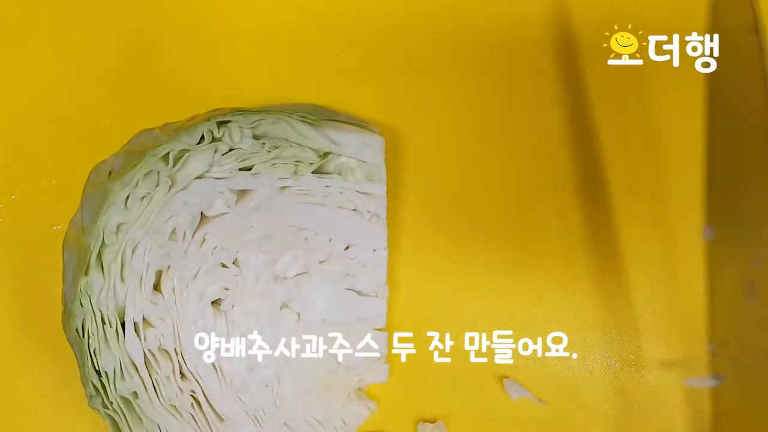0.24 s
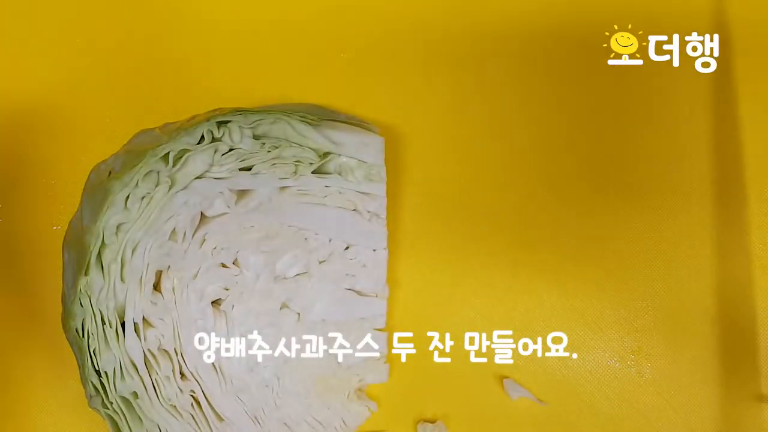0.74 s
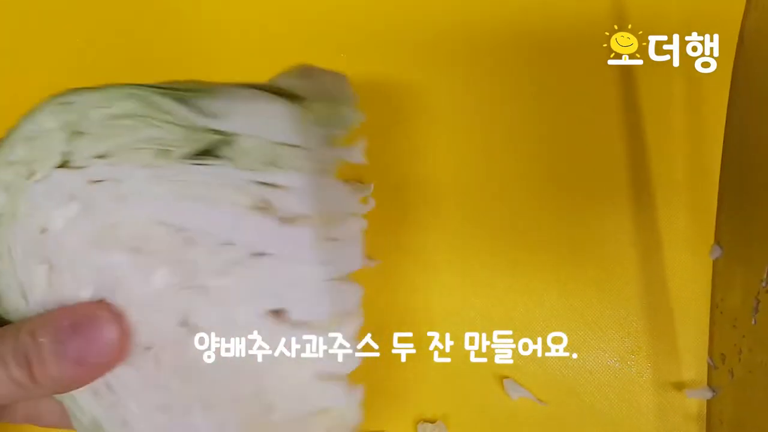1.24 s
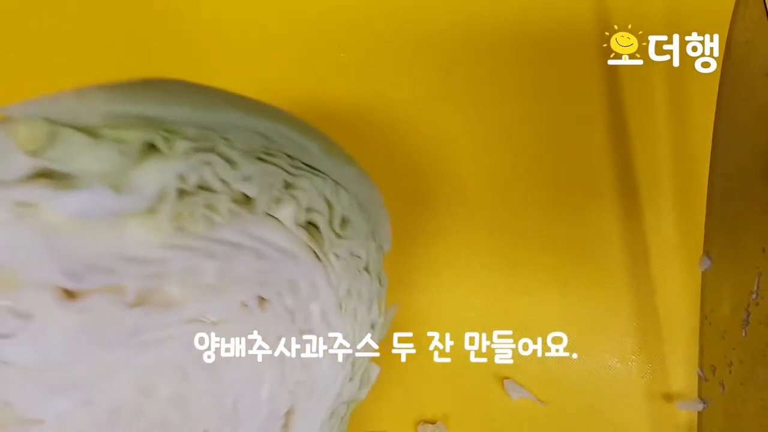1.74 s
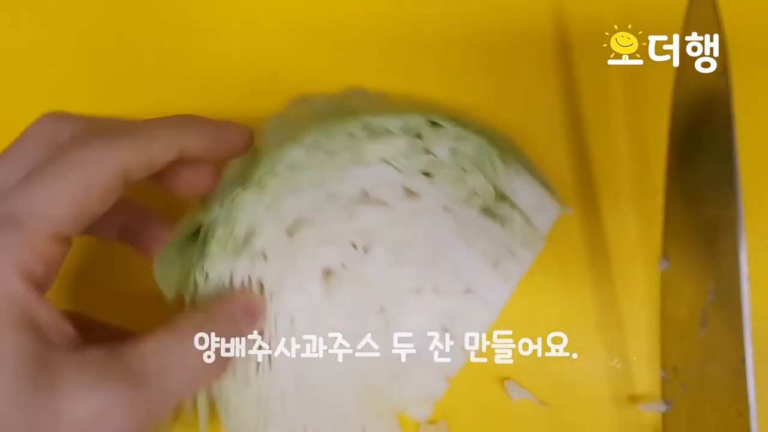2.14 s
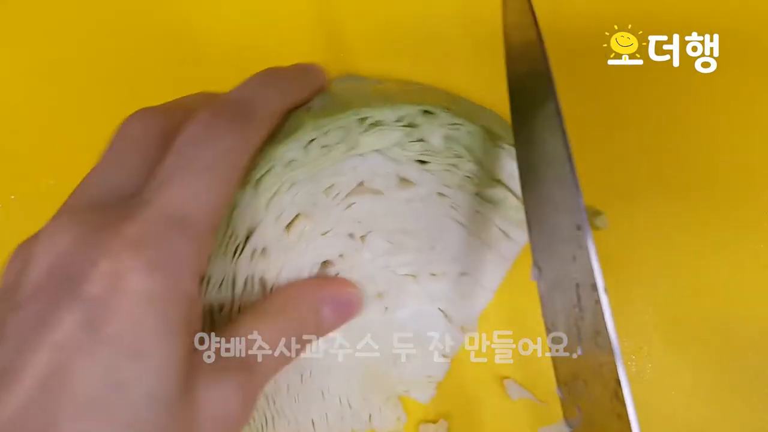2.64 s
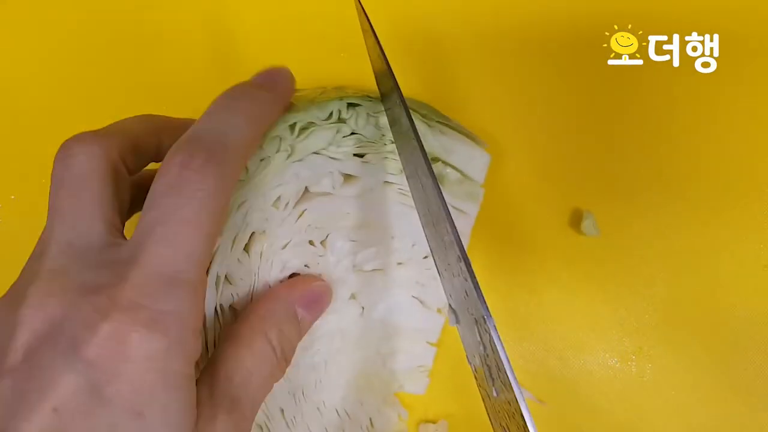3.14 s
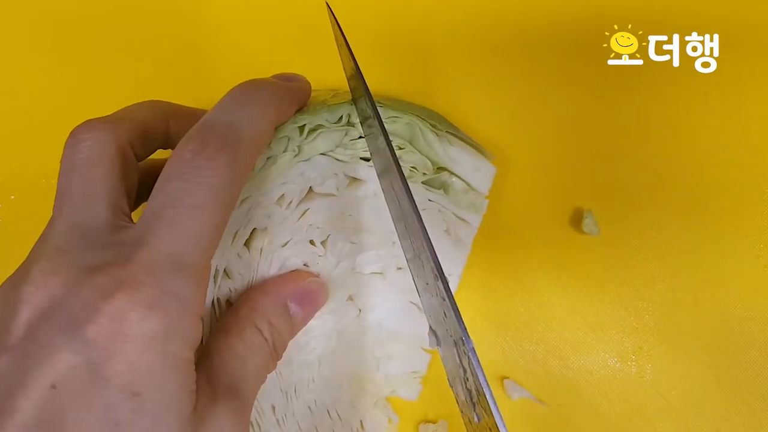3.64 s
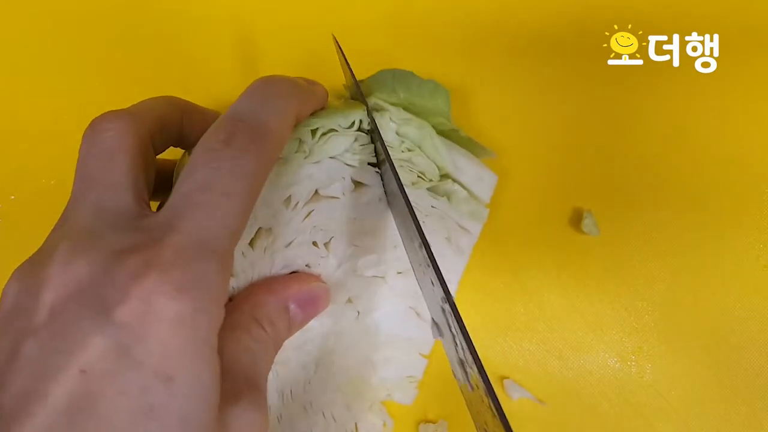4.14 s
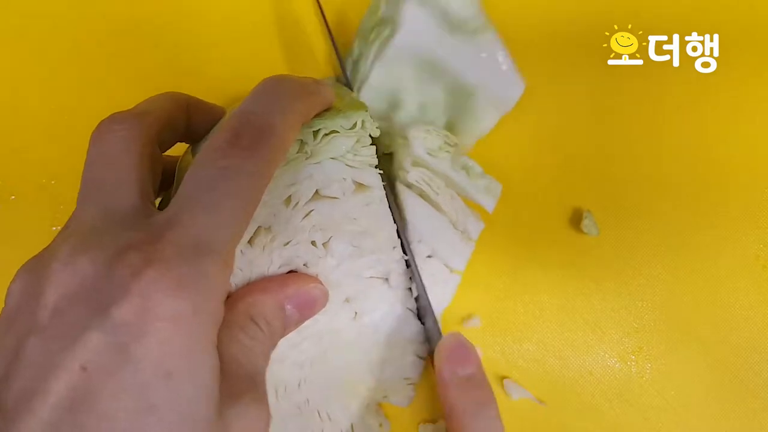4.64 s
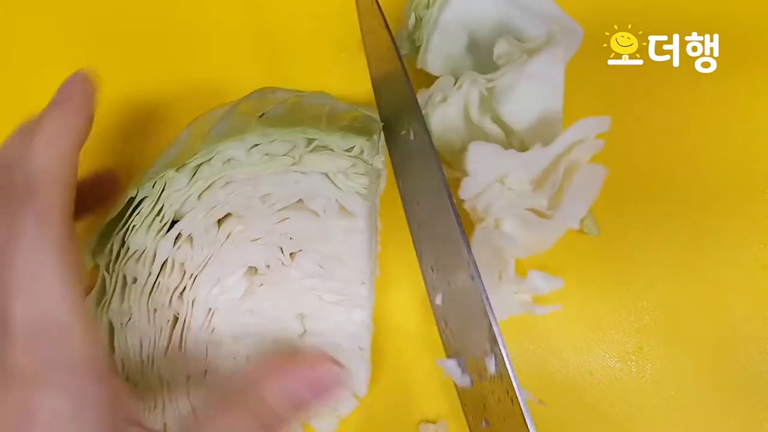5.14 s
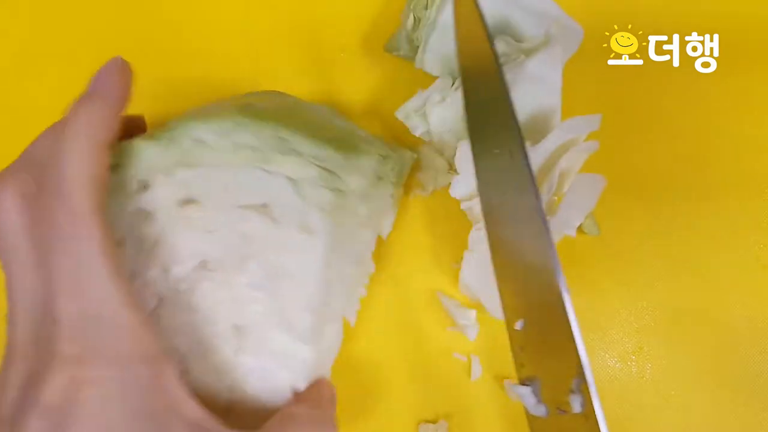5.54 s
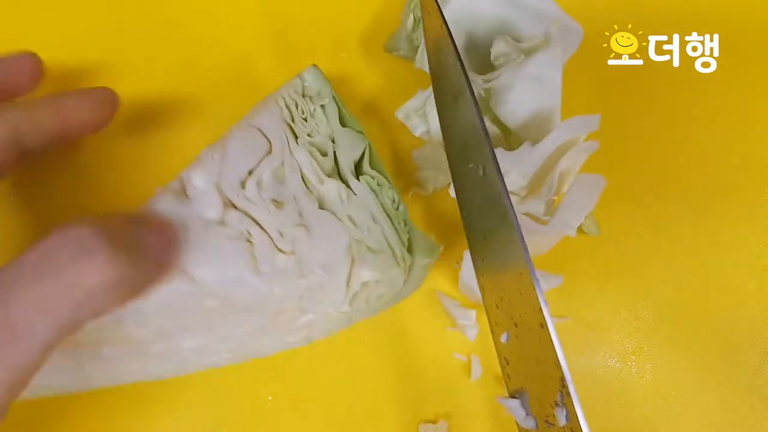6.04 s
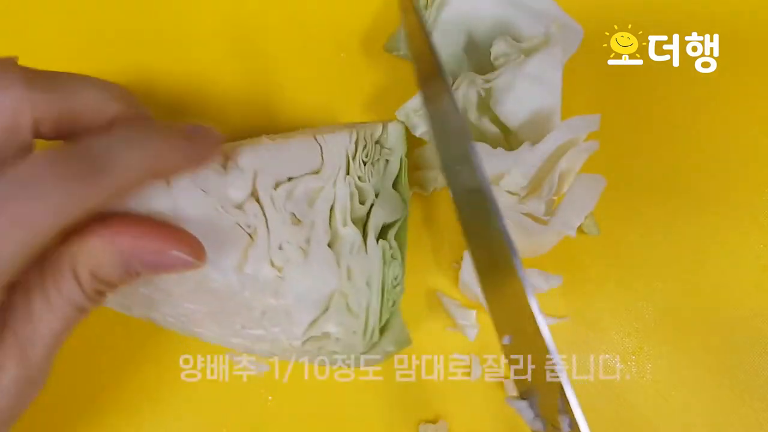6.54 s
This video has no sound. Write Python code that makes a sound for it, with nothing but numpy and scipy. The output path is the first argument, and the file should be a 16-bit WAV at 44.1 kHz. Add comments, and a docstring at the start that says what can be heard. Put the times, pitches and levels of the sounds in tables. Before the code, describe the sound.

Wooden board clatters and soft thuds, cabbage rustling as it is turned, then a knife crunches through it in two pushes, ending in a sharp knock.

```python
"""A knife crunches down through a wedge of raw cabbage in two pushes, after a hand has turned it on the board.
Leaf cells burst in dense random clicks shaped by band-passes; single ribs snap as short splinters of noise.
Blows and the push of the knife ring decaying modes of the board, the worktop and the blade.
Rubbed leaves rustle, loose ones tick, and a faint squeak swells at the very end.
A small hard kitchen answers with decaying noise, over filtered noise for a fridge hum and microphone hiss."""
import sys
import numpy as np
from scipy import signal
from scipy.fft import rfft, irfft
from scipy.io import wavfile
from scipy.ndimage import uniform_filter1d

SR = 44100
rng = np.random.default_rng(int(sys.argv[2]) if len(sys.argv) > 2 else 0)


def file_out(sig):
    """Save sig as 16-bit WAV at sys.argv[1]."""
    # one column per channel
    cols = np.atleast_2d(sig).T
    # limit, then scale
    lim = np.clip(cols, -1, 1)
    pcm = np.round(lim * 32767).astype(np.int16)
    wavfile.write(sys.argv[1], SR, pcm)


N = 299880  # length in samples


def undb(db):
    """Turn decibels into a plain gain."""
    return 10 ** (np.asarray(db) / 20)


def unit(x):
    """Scale a signal to an average (RMS) level of 1."""
    return x / np.sqrt(np.mean(x ** 2))


def sides(pan_db):
    """Gains of left and right; a positive pan_db makes the left louder by that much."""
    return undb(np.array([pan_db, -pan_db]) / 2)


def lowpass(x, edge_hz):
    """Dull a sound by weakening what lies above edge_hz."""
    return signal.lfilter(*signal.butter(2, edge_hz / SR * 2), x)


def colour(x, peaks):
    """Sum of band-passes, each with gain 1 at its centre before its own level is applied."""
    total = 0
    for hz, width_hz, db in peaks:
        total = total + undb(db) * signal.lfilter(*signal.iirpeak(hz, hz / width_hz, SR), x)
    return total


def ring(x, modes, free=0.76):
    """Each mode is a decaying rotation pushed by x; a hand or a weight on it (small free) shortens the ring."""
    total = 0
    for k, (hz, db, t60) in enumerate(modes):
        pole = np.exp(2j * np.pi * hz / SR - np.log(1000) / (free * t60 * SR))
        swing = signal.lfilter([pole.imag], [1, -2 * pole.real, abs(pole) ** 2], x)
        # neighbours swing in opposite sense, so little sounds below and above them
        total = total + (-1) ** k * undb(db) * swing
    return total


def walk(rate):
    """Random levels, a new one every 1 / rate s, smoothed twice into gentle wandering."""
    k = int(SR / rate)
    steps = np.repeat(rng.standard_normal(N // k + 1), k)
    return uniform_filter1d(uniform_filter1d(steps, k), k)[:N]


def bursts(per_s, spread_db):
    """Random clicks of either sign, a few much larger than the rest."""
    chance = rng.random((3, N))
    happens = chance[0] < per_s / SR
    size_db = spread_db * np.minimum(-np.log(1 - chance[2]), 4)
    return happens * np.sign(chance[1] - .5) * undb(size_db)


def follow(tables):
    """Columns of the curve tables, sample by sample, and a gate that is shut outside them."""
    t, rows = np.arange(N) / SR, np.vstack(tables)
    gate = sum((t >= table[0][0]) & (t < table[-1][0]) for table in tables)
    curves = [np.interp(t, rows[:, 0], column) for column in rows[:, 1:].T]
    return uniform_filter1d(np.minimum(gate, 1.), 201), curves


# Colour of the quiet kitchen. Each row: frequency in Hz, relative strength in dB per Hz.
STILL = [(25, -14), (50, -1), (90, -10), (122, 1), (150, -11), (340, -13), (550, -19), (1500, -22),
         (2500, -26), (5500, -34), (9000, -37), (13500, -33), (15800, -36)]
# How much left and right share. Each row: frequency in Hz, likeness from 0 to 1.
ALIKE = [(60, 0.66), (130, 0.67), (290, 0.5), (700, 0.53), (1400, 0.12)]
STILL_DB = -67  # level of what both sides share, before the balance of left and right


def still():
    """Steady air with the drone of a fridge and microphone hiss, most alike at both sides in the bass."""
    log_hz = np.log(np.maximum(np.fft.rfftfreq(N, 1 / SR), 1))
    still_hz, strength_db = np.array(STILL).T
    alike_hz, likeness = np.array(ALIKE).T
    gain = undb(np.interp(log_hz, np.log(still_hz), strength_db))
    alike = np.clip(np.interp(log_hz, np.log(alike_hz), likeness), 0, 1)
    mid, side = rfft(rng.standard_normal((2, N))) * gain * np.sqrt([1 + alike, 1 - alike])
    air = irfft(np.array([mid + side, mid - side]), N) / np.std(irfft(mid, N))
    return undb(STILL_DB) * air * sides(2.2)[:, None]


# Seconds in which the echoes sink by 60 dB: bass and treble from the walls, then nearby surfaces.
KITCHEN_T60_LOW, KITCHEN_T60_HIGH, NEAR_T60 = 0.36, .21, 0.06
NEAR_DB = 3.5  # starting strength of the near echoes against the far ones
KITCHEN_DB = -2.5  # echo strength against the direct sound


def kitchen(x):
    """Diffuse echoes, different at each side: quick ones from nearby surfaces, then walls, treble dying first."""
    t = np.arange(SR // 2) / SR
    noise = rng.standard_normal((2, len(t)))
    low = signal.lfilter(*signal.butter(1, 3000 / SR * 2), noise)
    tail = low * undb(-60 * t / KITCHEN_T60_LOW) + (noise - low) * undb(-60 * t / KITCHEN_T60_HIGH)
    tail += noise * undb(NEAR_DB - 60 * t / NEAR_T60)
    tail *= np.minimum(t / 0.0013, 1)  # echoes fade in over 1.3 ms
    tail = signal.lfilter(*signal.butter(2, 220 / SR * 2, "high"), tail)
    tail /= np.sqrt(np.sum(tail ** 2, axis=1, keepdims=True))
    return undb(KITCHEN_DB) * signal.fftconvolve(x, tail, axes=1)[:, :N]


# The level passes SQUEAK_DB at SQUEAK_FROM_S, climbing all the time.
SQUEAK_FROM_S, SQUEAK_HZ, SQUEAK_DB, SQUEAK_SWELL_DB_PER_S = 6.755, 940, -80, 398


def squeak():
    """Quick stick-slip: a slightly rough tone and its octave."""
    since = np.arange(N) / SR - SQUEAK_FROM_S
    rough_hz = SQUEAK_HZ * (1 + 0.0123 * walk(350))
    phase = 2 * np.pi * np.cumsum(rough_hz) / SR
    return undb(SQUEAK_DB + SQUEAK_SWELL_DB_PER_S * since) * (np.sin(phase) + .5 * np.sin(2 * phase))


# Seconds from which the ticks have full strength.
TICKS_PER_S, TICK_DB, FULL_TICKS_FROM_S = 14., -70, .9


def ticks():
    """Loose leaves settle with faint scattered ticks, each a few ms of splinters."""
    t = np.arange(1024) / SR
    strength = np.where(np.arange(N) / SR < FULL_TICKS_FROM_S, .4, 1)
    starts = np.abs(bursts(TICKS_PER_S, spread_db=3.0)) * strength
    shape = signal.fftconvolve(starts, np.exp(-t / 0.0048))[:N]
    noise = rng.standard_normal((2, N))
    splinters = unit(colour(noise, CELL)) + undb(-8.0) * unit(colour(noise, CELL_TOP))
    return undb(TICK_DB) * shape * splinters


# Leaves rubbed by hand, blade or board; each swells from and dies to 20 dB below its loudest.
# Each row: loudest moment in seconds, swell in seconds, dying in seconds, crackle level in dB,
# brightness in dB and fullness in dB, both against the crackle.
RUSTLES = [(0.973, 0.091, 0.36, -61.5, 4, 7.5), (1.048, 0.03, 0.061, -54, -15, -16),
           (1.168, 0.11, 0.0097, -83, -12, 31.5), (1.4, 0.016, 0.15, -55, -4, -27),
           (1.501, 0.014, 0.023, -61, -12, 4), (1.6, 0.099, 0.068, -73.5, -3, 1),
           (1.84, 0.05, 0.083, -72.5, 8, -11), (1.904, 0.0026, 0.087, -53, 3.5, -11),
           (2.07, 0.055, 0.021, -37.5, 6, -11), (2.103, 0.012, 0.047, -30.5, 4, 3),
           (2.337, 0.18, 0.025, -59.5, -5, -0.5), (2.501, 0.0058, 0.01, -64, -44, -18),
           (2.602, 0.028, 0.9, -68.5, -3, 0), (2.766, 0.79, 0.06, -67.5, 6, 9),
           (2.896, 0.096, 0.022, -70.5, 12, 11), (3.164, 0.11, 0.022, -68.5, -7, -12),
           (3.245, 0.0097, 0.041, -70, 13, -8), (3.358, 0.009, 0.03, -63, 5, 3.5),
           (3.68, 0.15, 0.033, -71.5, 6, 7.5), (5.046, 0.053, 0.051, -66, -2, -13),
           (5.201, 0.079, 0.37, -72.5, 4, 7), (5.352, 0.11, 0.066, -60, 5, 4),
           (5.41, 0.015, 0.11, -58, 1, -3), (5.59, 0.11, 0.31, -63, 4.5, 2.5),
           (5.741, 0.014, 0.0095, -48.5, 6, -20), (5.849, 0.023, 0.059, -54, 8, -1),
           (6.0, 0.041, 0.16, -80, 4, 10), (6.2, 0.11, 0.056, -72, 13, -9),
           (6.308, 0.055, 0.21, -75, 17, 0), (6.6, 0.071, 0.043, -82.5, 4, 21.5),
           (6.8, 0.11, .05, -67, 0, -5)]


def rustles():
    """Gains of body, top and low crackle: each rustle swells and dies evenly in dB, and their powers add."""
    t, power = np.arange(N) / SR, np.zeros((3, N))
    for s, swell, dying, db, bright_db, full_db in RUSTLES:
        peak_power = undb([db, db + bright_db, db + full_db]) ** 2
        fade = undb(-40 * np.maximum((s - t) / swell, (t - s) / dying))
        power += np.outer(peak_power, fade)
    return np.sqrt(power)


RUSTLE_LOAD_DB = -6  # how strongly the low part of the rubbing drives the hum


def worktop(rubbing):
    """The uneven push through the cabbage keeps worktop, board and blade humming; rubbing does so too."""
    gate, (_, _, load_db, _) = follow(CUTS)
    push = bursts(per_s=300., spread_db=3.0)
    hum = unit(ring(push, WORKTOP, 0.18))
    hum = hum + undb(-10.5) * unit(ring(push, BOARD, 0.16))
    hum = hum + undb(-17.5) * unit(ring(push, BLADE, 0.18))
    load = gate * undb(load_db) + undb(RUSTLE_LOAD_DB) * rubbing[2]
    return load * hum * sides(2.7)[:, None]


DETUNE = .018  # each blow lands elsewhere and shifts the modes by about this share


def detuned(modes):
    """The same modes, each shifted a little in pitch."""
    shifts = DETUNE * rng.standard_normal(len(modes))
    return [(hz * (1 + shift), db, t60) for (hz, db, t60), shift in zip(modes, shifts)]


# Notes at which worktop, board, blade and the cracking surface ring.
# Each row: frequency in Hz, relative level in dB, seconds to sink by 60 dB when fully free.
WORKTOP = [(46.5, -28, 0.524), (78.9, -1.5, 0.97), (103.2, 3.5, 0.62), (123.1, 8.5, 0.57),
           (169.5, -9, 0.85), (213.7, -3, 0.65)]
BOARD = [(287.3, -3.5, 0.31), (334, -2.5, 0.48), (364, -5.5, 0.28), (414, 0, 0.17), (470, -5.5, 0.096),
         (514, -1, 0.15), (560, -10, 0.12), (618, -4.5, 0.17), (685, -5.5, 0.23), (954, -9, 0.11),
         (1180, -8, 0.11), (1112, -5.5, 0.17)]
BLADE = [(735, -5, 0.06), (782, 0, 0.085), (845, -9, 0.05)]
CRACK = [(1070, -35, 0.011), (1450, 0, 0.031), (1750, 4, 0.028), (2040, 5.5, 0.027), (2370, 9, 0.012),
         (3040, 7, 0.0061), (4400, -5.5, 0.0014), (7100, -21, 0.0052), (11000, -44, 0.00085)]
# The contact itself, heard before the board rings.
# Each row: centre in Hz, width in Hz, level in dB against the ring of the board.
TOUCH = [(472, 940, -5)]
# Blows on the board; the rows from 5.18 s on are the blade rubbing and squeaking. # Each row: start in seconds,
# then the levels of board, worktop, blade and crack in dB, # freedom to ring from 0 to 1 (0.1 at least is
# used), contact in ms.
KNOCKS = [(0.484, -66, -42.5, -74, -71, 0.11, 1.7), (0.512, -26, -54, -62, -39, 0.24, 4.4),
          (0.518, -24, -50, -30, -36.5, 0.33, 4.8), (0.533, -33, -64, -47, -42, 0.41, 30),
          (0.562, -30.5, -61, -45, -63, 0.26, 6.2), (0.578, -29.5, -59, -51, -63, 0.22, 7.9),
          (0.594, -37.5, -54, -39, -48.5, 1, 5.7), (0.8042, -30.5, -37, -57, -67, 0.46, 6.7),
          (0.826, -32.5, -27.5, -65, -49, 0.02, 9.8), (0.8764, -38.5, -35.5, -33, -46, 0.42, 1.03),
          (1.133, -57.5, -56, -51, -54, 1, 7.5), (1.165, -48.5, -46.5, -51, -66, 0.43, 2.5),
          (1.319, -85, -56.5, -82, -75, 0.44, 8), (2.102, -26, -24.5, -34, -18, 0.22, 2.7),
          (2.1064, -33.5, -25, -38, -17.5, 0.54, 1.1), (2.126, -41, -23.5, -47, -55, 0.44, 1.9),
          (2.174, -66, -30, -67, -63, 0, 10), (2.256, -79, -49.5, -54, -63, 1, 0.66),
          (2.692, -58.5, -48, -70, -50, 0.2, 10.2), (4.4072, -19, -27.5, -51, -32, 0.1, 0.68),
          (4.424, -31, -41, -60, -54, 0.1, 1.72), (4.849, -37, -65, -56, -55, 0.05, 3.77),
          (5.047, -68, -56, -48, -75, 0.3, 1.3), (5.186, -60.5, -70, -60.5, -76, 0.7, 7),
          (5.221, -61, -74, -63, -76, 0.9, 12), (5.362, -61, -70, -54, -61, 0.4, 15),
          (5.385, -72, -71, -53, -65, 0.45, 19), (5.416, -66, -71, -65, -70, 0.5, 5.6),
          (5.543, -63, -54.5, -58, -70, 0.7, 7.5), (5.569, -55.5, -61, -55, -64, 0.94, 17),
          (5.619, -54, -72, -56, -57, 0.22, 2.5)]
STRIKE = .9  # first touch against the rattle after it
THUD_EDGE_HZ = 2250  # edge of the dulling for a contact of 1 ms
KNOCK_PAN_DB, KNOCK_LAG = 2.5, 6  # the board lies to the left: louder there, later at the right (samples)


def knocks():
    """A rattling contact drives board, worktop, blade and the hard crack of the surface, each at its own level."""
    out, t = np.zeros(N + SR // 3), np.arange(SR // 3) / SR
    for s, *dbs, free, contact_ms in KNOCKS:
        shape = t / (max(contact_ms, .2) / 1000)
        rattle = np.minimum(6 * shape, 1) * np.exp(-shape) * rng.standard_normal(len(t))
        rattle[0] += STRIKE * np.sqrt(np.sum(rattle ** 2))  # the first touch is one clean blow
        # longer contact, duller thud
        thud = lowpass(rattle, np.clip(THUD_EDGE_HZ / contact_ms ** 0.57, 500, 5000))
        free = np.clip(free, .1, 1.5)
        board, top, blade = [ring(thud, detuned(modes), free) for modes in (BOARD, WORKTOP, BLADE)]
        touch = colour(thud, TOUCH)
        board = board / np.abs(board).max() - touch * undb(TOUCH[0][2]) / np.abs(touch).max()
        # a soft blow, weak in crack against the board, also has a duller crack
        edge_hz = np.clip(5500 * undb(0.49 * (dbs[3] - dbs[0])), 1500, 18000)
        crack = lowpass(ring(rattle, CRACK, free), edge_hz)
        i = int(s * SR)
        for gain, part in zip(undb(dbs), (board, top, blade, crack)):
            out[i:i + len(t)] += gain * part / np.abs(part).max()
    both = np.array([out[:N], np.roll(out, KNOCK_LAG)[:N]])
    return sides(KNOCK_PAN_DB)[:, None] * both


# Ribs that snap, with short squeaks near 1.9 to 2.05 s and the click of the blow at 4.407 s. # Each row: start
# in seconds, level in dB, brightness in dB against that, # note of the hollow between the leaves in Hz.
SNAPS = [(0.148, -65.5, 4, 2500), (0.386, -61, -5, 1490), (0.488, -65.5, 15, 2650),
         (0.5154, -42.5, -15, 2610), (0.965, -63, 5, 746), (1.0297, -43, 2, 1110), (1.068, -62, 7, 5600),
         (1.048, -47.5, 4, 2340), (1.399, -44.5, -17, 1480), (1.412, -48, -9, 6900), (1.46, -47, 1, 1620),
         (1.499, -47, -4, 3240), (1.644, -53, -42, 1470), (1.729, -56, -29, 1500), (1.808, -63.5, 14, 1090),
         (1.832, -55, 0, 1680), (1.9056, -40.5, -4, 1440), (1.967, -44.5, -26, 1210),
         (1.9875, -45, -22, 1180), (2.0291, -38, -11, 1100), (2.0436, -34, -20, 810),
         (2.0548, -31, -8, 1520), (2.2873, -59, 4, 781), (2.424, -90.5, -10, 1720), (2.498, -57, -15, 2420),
         (2.532, -53.5, -23, 1830), (2.5622, -55, -25, 2150), (3.111, -54.5, 2, 2080),
         (3.164, -56, -15, 1630), (3.245, -60.5, 12, 1700), (3.357, -61, 9, 900), (3.7192, -51, -19, 1870),
         (3.7264, -42, -17, 1500), (3.808, -46, -10, 1300), (3.8157, -40, -5, 1530),
         (3.8601, -29, -22, 2560), (3.8741, -32.5, -2, 1800), (3.8885, -31, -17, 2620),
         (3.912, -28.5, -5, 1580), (3.9176, -36, 8, 1710), (3.929, -39, -20, 1380), (3.968, -32, -22, 1100),
         (3.973, -32, -22, 2220), (3.9847, -38, -21, 1080), (4.0514, -53, -24, 1720),
         (4.1314, -35.5, -22, 1414), (4.153, -38.5, -19, 2764), (4.25, -30, -15, 1500),
         (4.2543, -30, -25, 2000), (4.2711, -29, -26.5, 1680), (4.296, -28, -8, 1170),
         (4.316, -26, -15, 3850), (4.4066, -29, -20, 1088), (4.495, -40, -12, 1693),
         (4.525, -33.5, -7, 1083), (4.546, -33, 8, 1100), (4.56, -30, -7, 1040), (4.628, -36.5, -18, 4933),
         (4.6626, -38, -32, 1002), (4.681, -42, -20, 819.5), (4.734, -41.5, -25, 1897),
         (4.789, -37, -27, 2103), (4.798, -37, -30, 927), (4.821, -49, -33, 1076), (4.84, -48, -33, 1100),
         (4.923, -41.5, -2, 1875), (5.026, -49.5, -24, 1450), (5.4058, -48, -4, 1510),
         (5.414, -58.5, 0, 4660), (5.466, -47, 0, 2030), (5.5775, -46, 2, 3930), (5.632, -51, -10, 1410),
         (5.6783, -62, 15, 4800), (5.72, -52, -11, 1490), (5.7366, -40, 4, 1720), (5.808, -49.5, -7, 1830),
         (5.8469, -40.5, 0, 2390), (6.012, -70, 9, 4050), (6.0561, -51, -2, 1630), (6.154, -62, 2, 1760),
         (6.194, -59, 11, 756), (6.304, -62.5, 21, 1375), (6.4401, -58, 4, 735), (6.664, -63, 11.5, 738),
         (6.695, -74, 30.5, 767), (6.707, -61.5, 25.5, 1150), (6.744, -52, 10, 1110)]
HOLLOW_DB = -2  # the hollow's note against the snap's body
SNAP_PAN_DB, SNAP_SCATTER_DB = 3, 8  # average lean to the left, random spread around it
SNAP_RISE_S, CLICK_S = .0004, .0012  # the treble of a snap is mostly its first instant


def snaps():
    """A sharp click, a few ms of splinters, and a short note from the hollow next to the rib."""
    out, t = np.zeros((2, N + 2048)), np.arange(2048) / SR
    for s, db, bright_db, hollow_hz in SNAPS:
        fade = np.exp(-t / 0.0012) + 0.49 * np.exp(-t / 0.0058)
        split = rng.standard_normal(len(t)) * fade * np.minimum(t / SNAP_RISE_S, 1)
        body = colour(split, CELL)
        click = colour(split * (np.exp(-t / CLICK_S) + 0.1), CELL_TOP)
        hollow = ring(split, [(hollow_hz, 0, .011)])
        gains = undb([0, bright_db, HOLLOW_DB])
        snap = sum(gain * part / np.abs(part).max() for gain, part in zip(gains, (body, click, hollow)))
        pan = sides(SNAP_PAN_DB + SNAP_SCATTER_DB * rng.standard_normal())
        i = int(s * SR)
        out[:, i:i + len(t)] += undb(db) * np.outer(pan, snap)
    return out[:, :N]


# Colour of bursting cells: their body, their treble, and the low part from tearing ribs.
# Each row: centre in Hz, width in Hz, relative level in dB.
CELL = [(2155, 670, 7), (2650, 1400, 9.5), (4310, 1670, 0.5), (6240, 720, -2.5)]
CELL_TOP = [(7740, 10800, 0), (11800, 17000, 0.064)]
CELL_LOW = [(780, 160, -2), (1043, 150, -3.5), (1536, 1250, 4)]
# The knife going through, one table per push. Each row: time in seconds, crackle level in dB,
# fullness in dB against the crackle, load on the worktop in dB, note of the opening slit in Hz.
CUTS = [
    [(3.68, -87, -8, -78, 1500), (3.734, -53.5, 4, -83, 1500), (3.762, -73, -15, -67, 1502),
     (3.848, -56, -14, -88, 1490), (3.88, -81, 8, -53, 1700), (3.915, -39, 0, -53, 1604),
     (3.94, -45, -5, -43, 1391), (3.975, -41.5, -3, -43, 2103), (4.015, -64, -15, -54, 1117),
     (4.05, -67, -13, -54, 1103), (4.1, -57, -5, -55, 1049), (4.126, -58.5, -15, -60, 1402),
     (4.152, -50, -25, -57, 2498), (4.2, -78, -13, -85, 1997), (4.24, -60.5, 7, -65, 1994)],
    [(4.246, -41.5, 3, -50, 2005), (4.26, -43.5, -3, -40, 1905), (4.29, -34.5, -5, -44, 1600),
     (4.315, -33, -4, -32, 1299), (4.335, -40.5, 9.5, -36.5, 1057), (4.375, -41.5, 6, -42.5, 1414),
     (4.4, -44, -1, -47, 1149), (4.435, -50, -19, -47, 996), (4.49, -43.5, -3, -44, 1489),
     (4.556, -45, -1.5, -46, 1058), (4.61, -47, -5, -46, 1103), (4.645, -61, -9, -56, 1095),
     (4.68, -52, -9, -50, 904.4), (4.72, -59.5, -6, -55, 1903), (4.77, -55.5, -4, -52.5, 1896),
     (4.8, -61, 18, -55, 899.4), (4.84, -50, 3, -52.5, 1158), (4.89, -61, -24, -61, 1097),
     (5.012, -68.5, -17, -63, 1360), (5.1, -72, -2, -79, 1390)],
]
CUT_BRIGHT_DB, CUT_PAN_DB, RUSTLE_PAN_DB = 7, 0.5, 1
SLIT_DB, SLIT_WIDTH_HZ = -2, 300


def leaves(rubbing):
    """Cells burst in clumps, partly different at each side, and thick ribs tear in coarser steps."""
    gate, (db, full_db, _, slit_hz) = follow(CUTS)
    clumps = undb(3.6 * walk(220))
    clumps = clumps * undb(1.0 * walk(45))  # leaf after leaf gives way
    own = np.array([bursts(per_s=2000., spread_db=4.0) for _ in range(2)])  # each side's own cells
    cells = (bursts(per_s=3700.0, spread_db=1.5) + 2.2 * own) * clumps
    ribs = bursts(per_s=380.0, spread_db=4.0) * clumps + 0.14 * cells
    body = unit(colour(cells, CELL))
    top = undb(-8.5) * unit(colour(cells, CELL_TOP))
    low = undb(-7.5) * unit(colour(colour(ribs, CELL_LOW), CELL_LOW))
    # the tearing also rings the slit beside the blade, whose note moves as it opens
    slit_tone = np.cos(2 * np.pi * np.cumsum(slit_hz) / SR)
    slit = lowpass(ribs + 0.32 * cells, SLIT_WIDTH_HZ / 2) * slit_tone
    tear = 1.04 * low + undb(SLIT_DB) * unit(slit)
    cut = gate * undb(db) * (body + undb(CUT_BRIGHT_DB) * top + undb(full_db) * tear)
    # rubbed leaves crackle with the same cells
    rub = sum(gain * part for gain, part in zip(rubbing, (body, top, low)))
    return cut * sides(CUT_PAN_DB)[:, None] + rub * sides(RUSTLE_PAN_DB)[:, None]


RIGHT_LAG = 4  # samples by which the right side hears all the near sounds later


def scene():
    """Add up the near sounds, let the kitchen answer them, and lay them over the still air."""
    rubbing = rustles()
    near = leaves(rubbing) + snaps() + knocks() + worktop(rubbing) + squeak() + ticks()
    near[1] = np.roll(near[1], RIGHT_LAG)
    # small sources radiate no slow pressure
    near = signal.sosfilt(signal.butter(3, 38, "high", fs=SR, output="sos"), near)
    return near + kitchen(near) + still()


TOP_HZ = 15900


def record(dry):
    """The recorder cuts the treble steeply above TOP_HZ."""
    return signal.sosfilt(signal.ellip(10, .2, 70, TOP_HZ, fs=SR, output="sos"), dry)


dry = scene()
out = record(dry)
file_out(out)
```